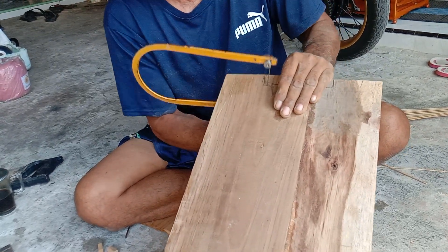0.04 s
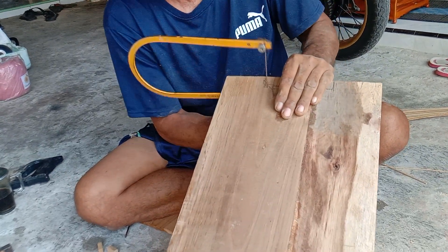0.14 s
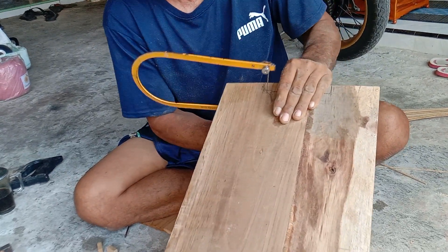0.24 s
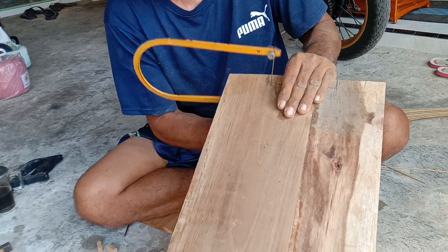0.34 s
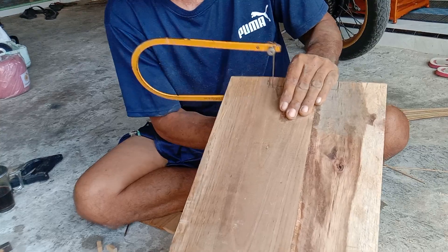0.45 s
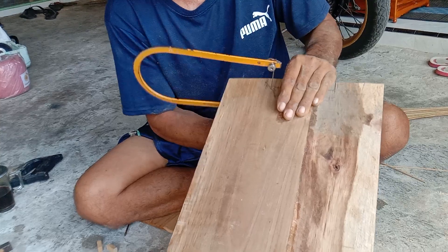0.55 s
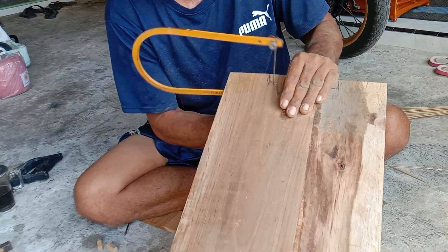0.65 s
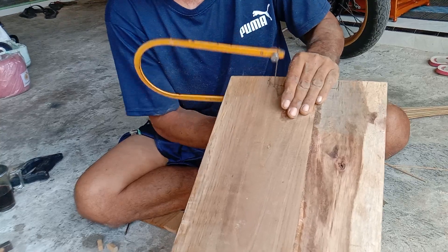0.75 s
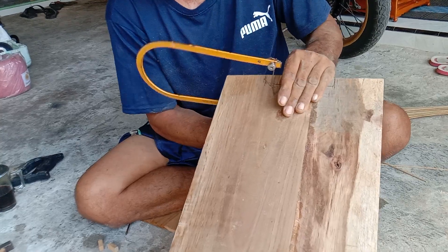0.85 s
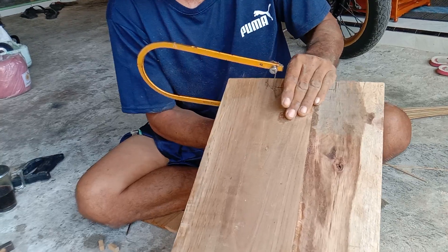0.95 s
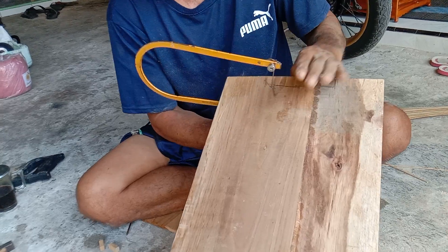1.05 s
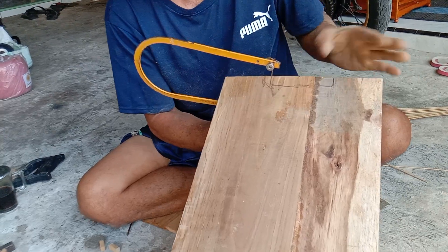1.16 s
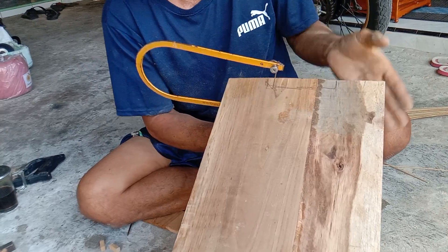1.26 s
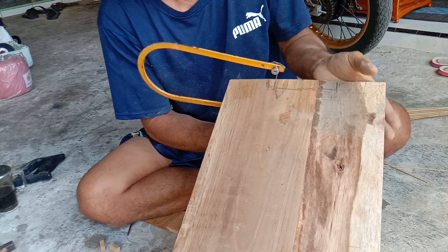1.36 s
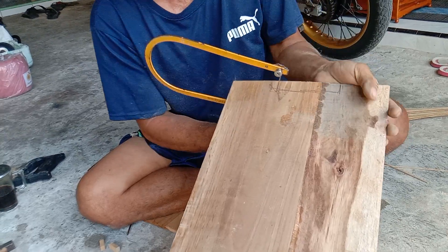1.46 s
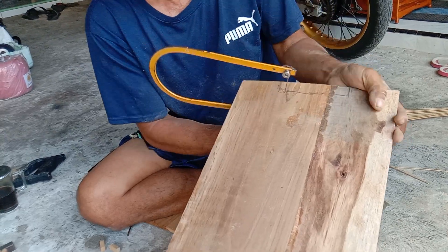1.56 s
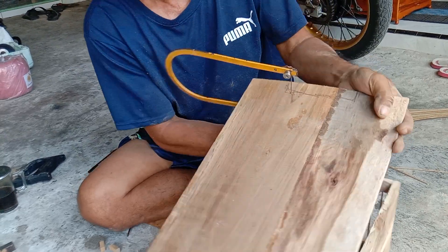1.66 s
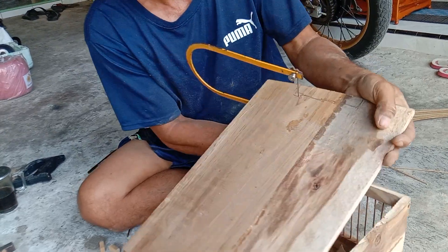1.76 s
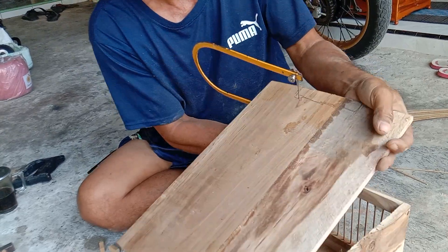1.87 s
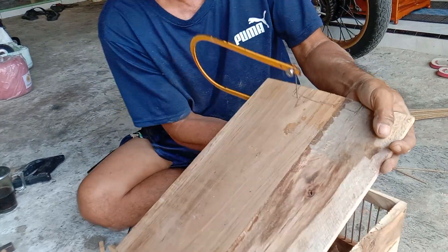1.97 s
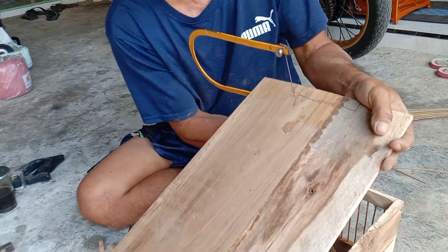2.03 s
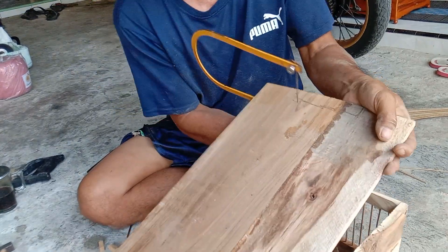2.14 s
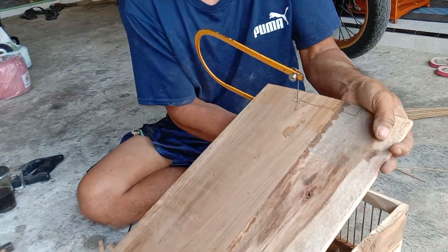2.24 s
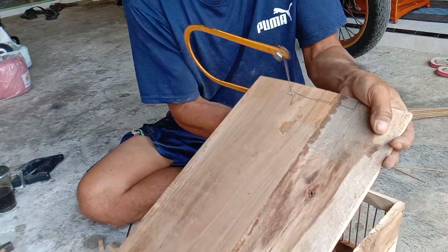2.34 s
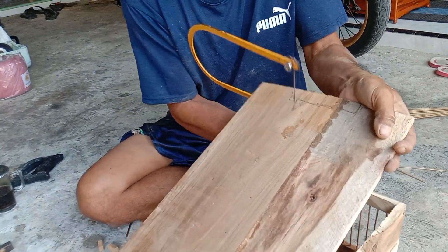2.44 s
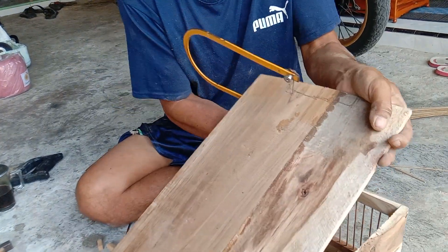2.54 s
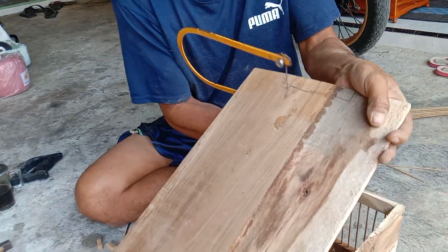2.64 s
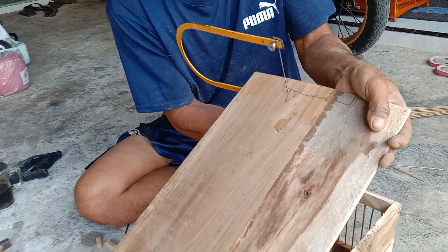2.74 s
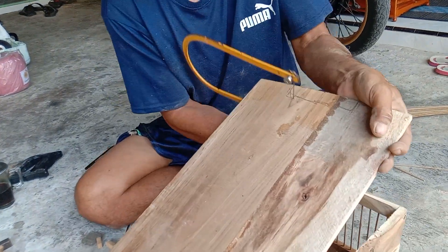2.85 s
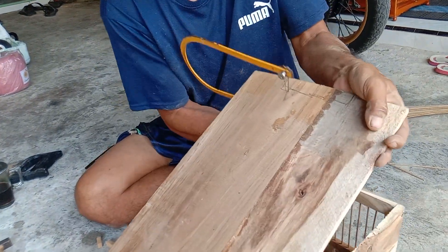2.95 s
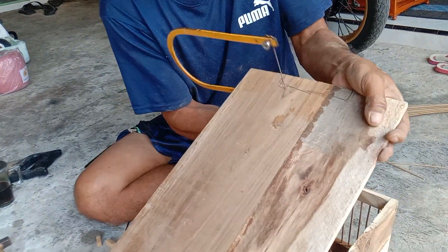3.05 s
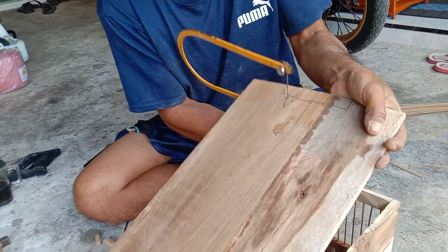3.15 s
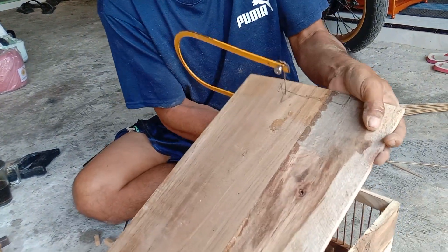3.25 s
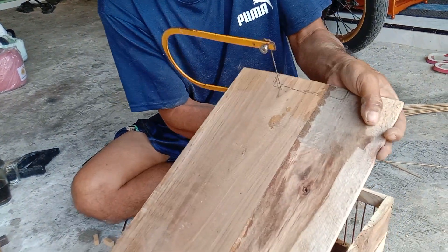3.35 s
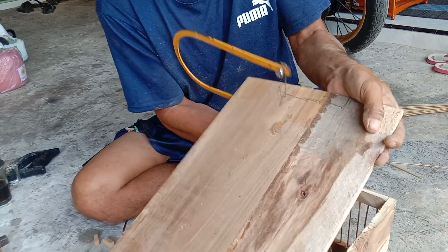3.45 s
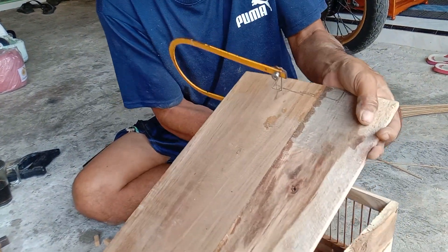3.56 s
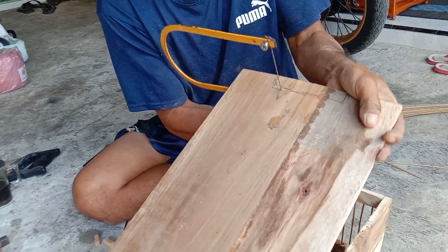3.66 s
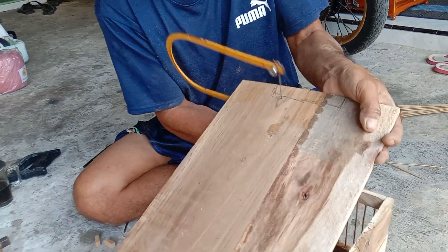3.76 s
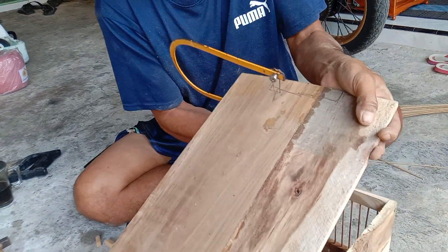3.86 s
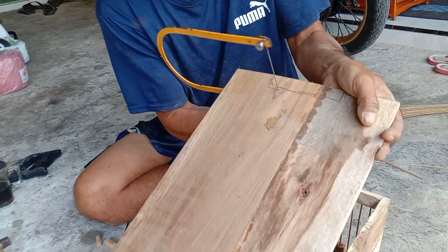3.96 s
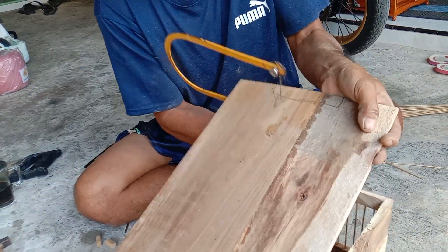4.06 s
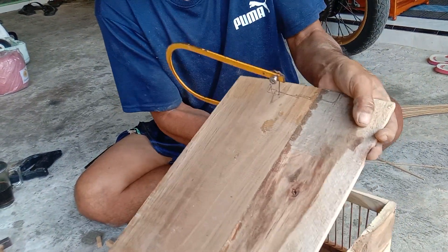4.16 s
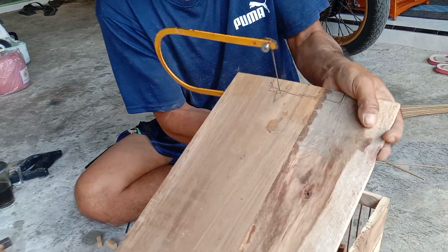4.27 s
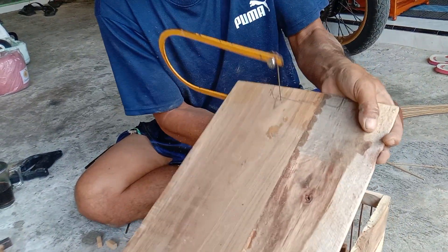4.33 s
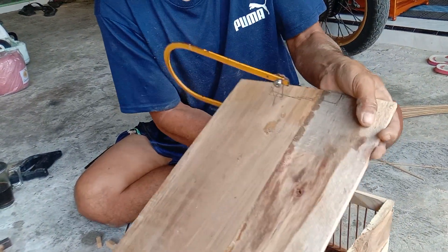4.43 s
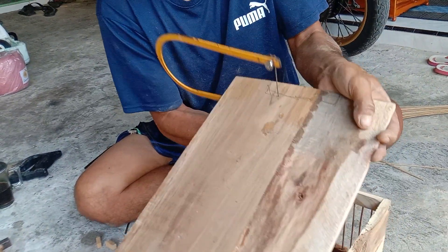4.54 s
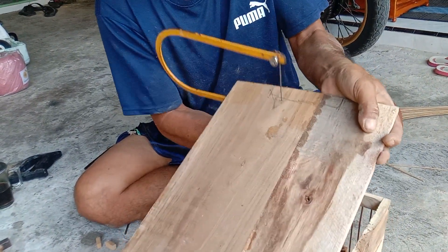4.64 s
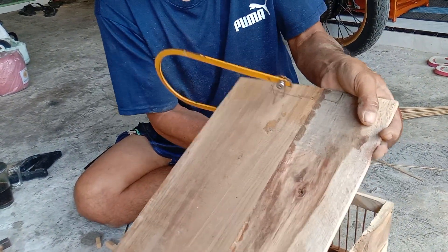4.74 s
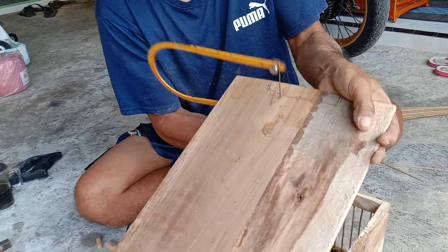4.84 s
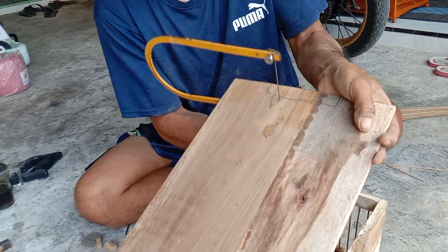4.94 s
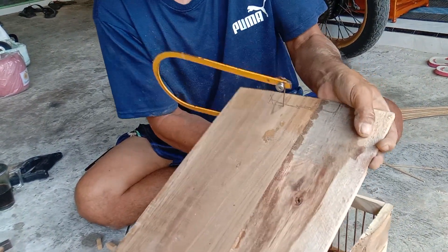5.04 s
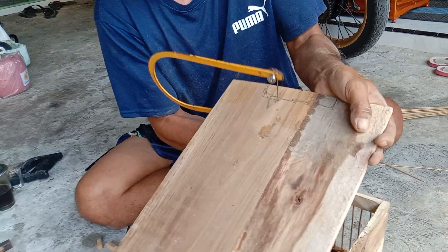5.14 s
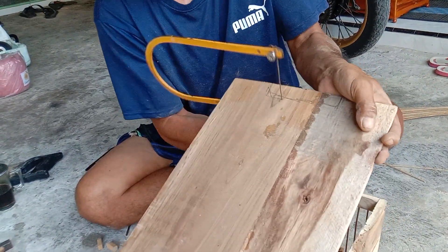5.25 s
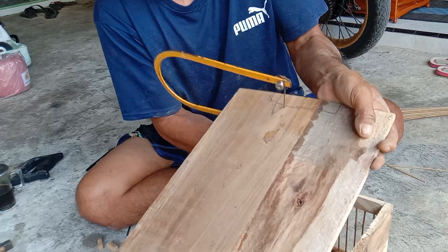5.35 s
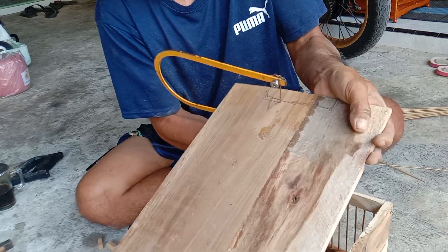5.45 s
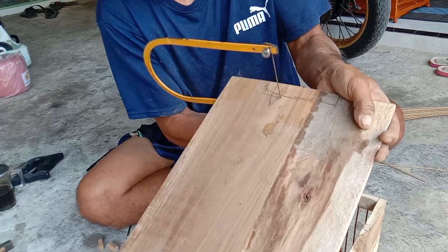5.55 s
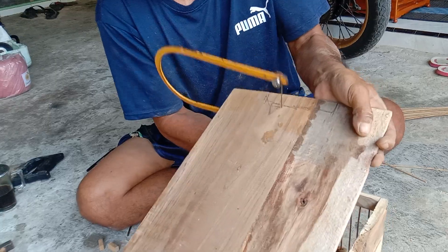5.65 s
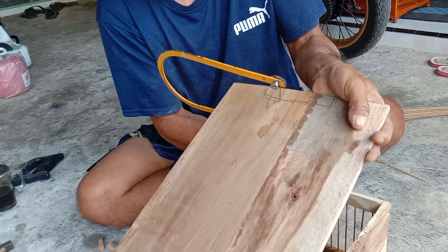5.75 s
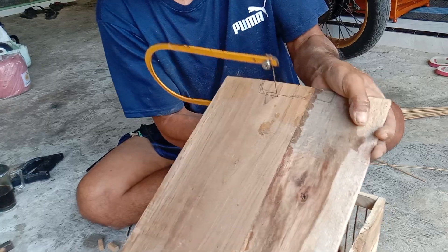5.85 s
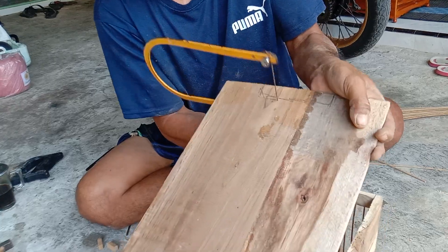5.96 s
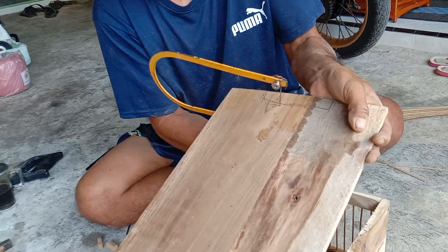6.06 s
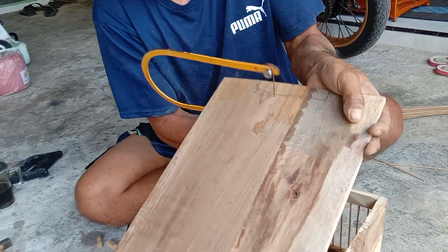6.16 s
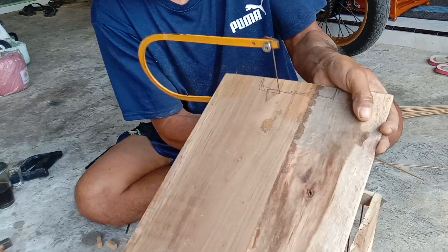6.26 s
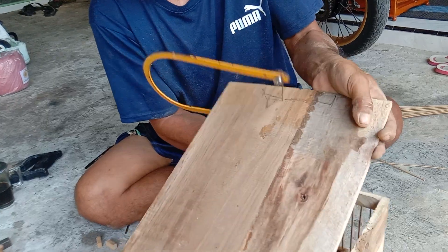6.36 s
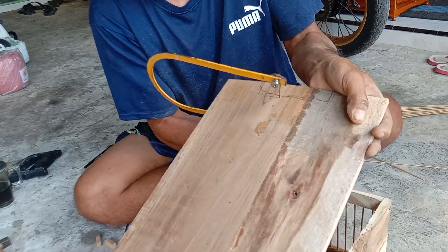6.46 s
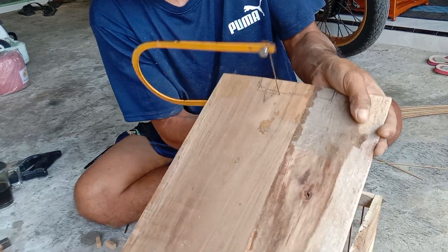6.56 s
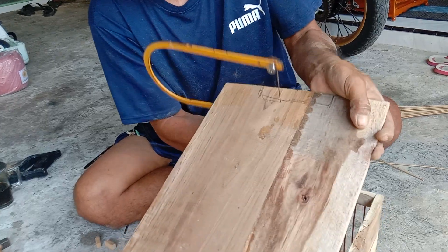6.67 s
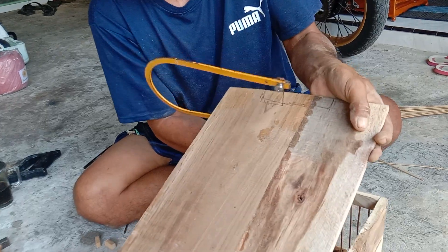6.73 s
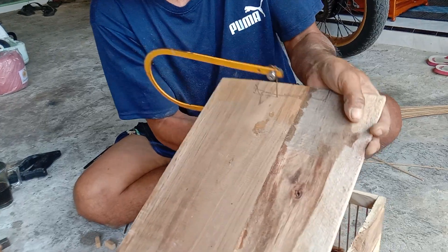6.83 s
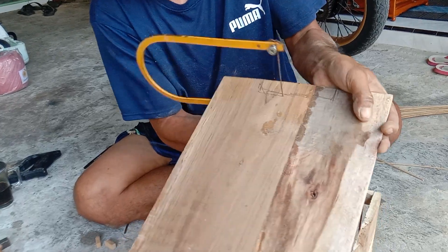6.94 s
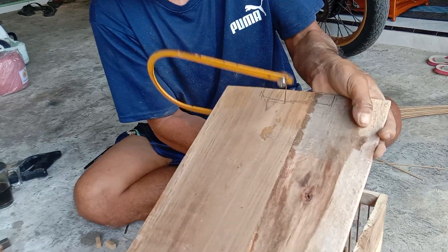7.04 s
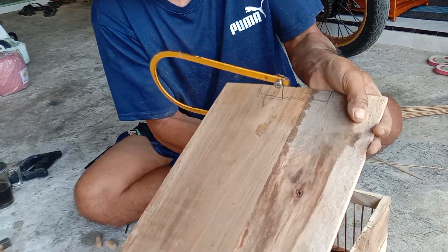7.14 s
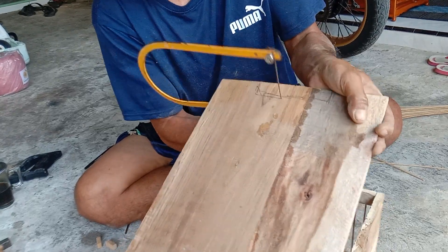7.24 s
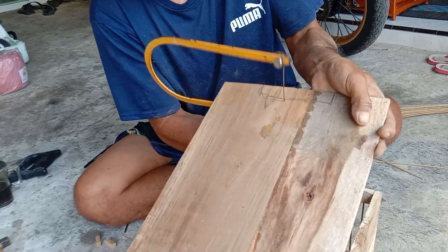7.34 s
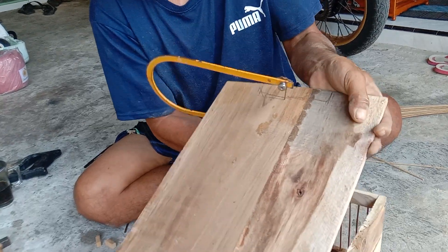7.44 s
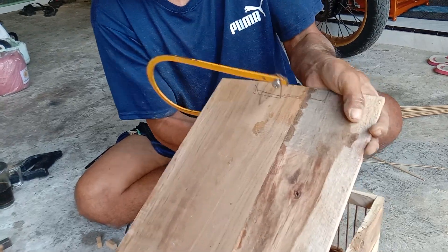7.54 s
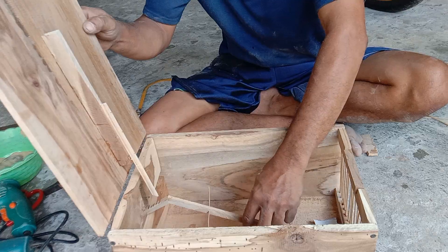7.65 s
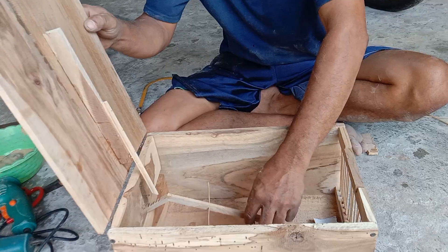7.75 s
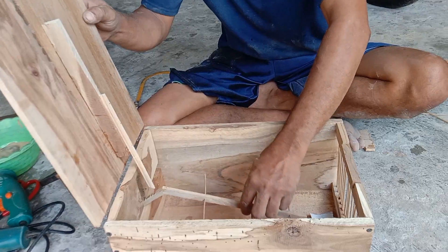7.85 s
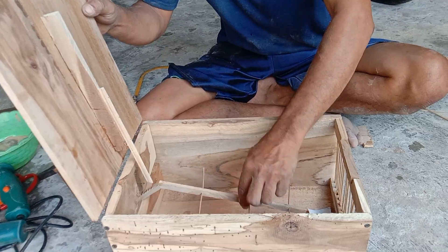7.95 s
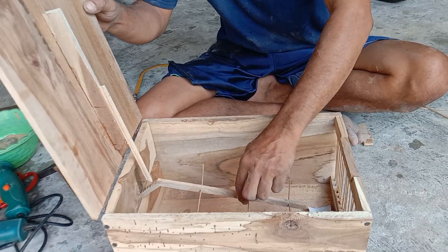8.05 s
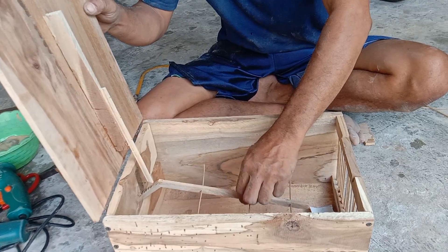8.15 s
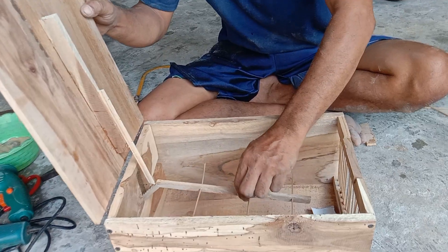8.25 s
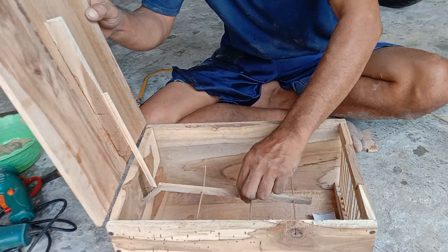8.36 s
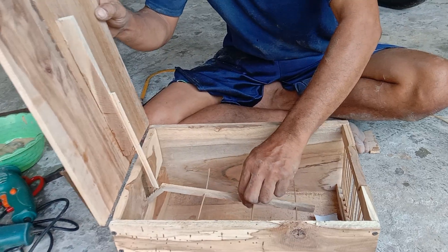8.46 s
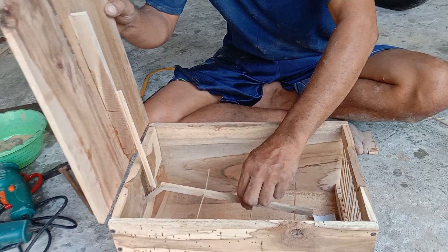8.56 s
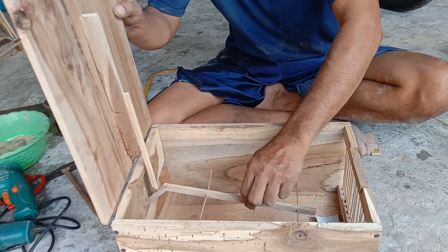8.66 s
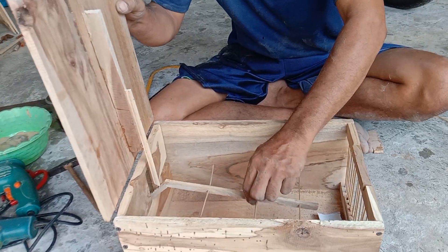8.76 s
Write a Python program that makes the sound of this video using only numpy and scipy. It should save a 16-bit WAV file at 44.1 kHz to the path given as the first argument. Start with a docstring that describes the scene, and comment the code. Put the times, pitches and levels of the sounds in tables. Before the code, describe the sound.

From 0 to about 1 second a small hand saw works in a wooden board: three strong rasping cuts with lighter return strokes, a hollow board tone, crunchy snags and bright steel ticks. From 1 to 2 seconds the sawing pauses; a hand slides over the wood with short soft rubs, strongest around 1.55 to 1.85, among faint blade flicks. From 2 to 7.47 sawing runs steadily, about three forceful cuts per second alternating with weaker returns, the board gaining body as the cut deepens. Everything drops silent until 7.58, then a tiny scrap of sawing ends at 7.62. Light wooden box knocks come near 7.7, with barely audible touches afterwards and a faint wavering low hum far off. At 8.5 a sharp, dry wooden clack rings and rattles briefly, leaving very quiet outdoor air. Close microphone, short dull porch reflections.

```python
"""A small coping saw cuts into a hand-held board on a porch, about three strokes a second, with one pause to regrip.
Striking teeth and snapping fibres, made of pulses and noise, pass through the ringing of board, blade and bow.
Short bursts add the snags and ticks of the blade; smooth noise rubs are the hand sliding on the wood.
All sound cuts out for a tenth of a second, then a brief scrap of sawing is heard; a wooden box is handled and knocked.
Faint outdoor air is shaped noise; a wavering low tone hums far off while the box is handled."""
import sys
import numpy as np
from scipy import signal
from scipy.fft import rfft, irfft
from scipy.io import wavfile
from scipy.ndimage import uniform_filter1d

SR = 44100
rng = np.random.default_rng(int(sys.argv[2]) if len(sys.argv) > 2 else 0)


def generate_wav(signal):
    """Clip the signal to [-1, 1] and save it as 16-bit WAV at the path in sys.argv[1]."""
    frames = np.transpose(np.atleast_2d(signal))
    scaled = np.clip(frames, -1, 1) * 32767
    pcm = np.round(scaled).astype(np.int16)
    wavfile.write(sys.argv[1], SR, pcm)


N = 388080
T = np.arange(N) / SR  # time axis, s
HAND_T = np.arange(0, N / SR, .001)  # coarser time axis for the hand's movements, s

# Levels in the tables are starting points: mixing trims and the final shaping come on top.
# colour of the outdoor air: [f/Hz, level/dB]
AIR = [(25, -26.5), (60, -13), (130, -11), (200, -13.5), (280, -18), (900, -28.5), (1290, -19.5),
       (1600, -24), (2200, -30.5), (3400, -32), (7000, -41), (15000, -62.5)]
AIR_DB = -70.5  # before its slow wander and fades
HUM_HZ, HUM_DB = 74, -69  # centre pitch and base level of the far hum
# wood touches the box: [t/s, level/dB]
BOX_TAPS = [(7.698, -44), (7.713, -48), (7.789, -53), (8.084, -58), (8.369, -58.5), (8.503, -20.5)]
# ringing tones of the box: [f/Hz, level/dB, time to fall 60 dB/s]
BOX_TONES = [(496, -2, 0.23), (617, -11.5, 0.26), (874, 5, 0.11), (1060, 5, 0.16), (1210, -4, 0.17),
             (1303, 9, 0.25), (1503, -8.5, 0.26), (2310, -11, 0.24), (2750, -12, .25), (2880, -7, .1),
             (3270, -17, .2), (3758, -24, 0.19), (5260, -15, 0.1), (5560, -12, .06)]
# colour of the dry clack on the box: [f/Hz, level/dB]
BOX_CRACK = [(120, -66), (200, -34), (471, -21), (858, -22.5), (1270, -6), (2060, -31), (2850, -18.5),
             (3210, -40), (5270, -41), (6150, -59), (12000, -62), (15600, -97), (22000, -120)]

# the hand slides to a new grip: [start t/s, length/s, board level/dB, hiss level/dB]
RUBS = [(1.0, 0.084, -57, -63), (1.135, 0.099, -48.5, -67), (1.4, 0.17, -51, -60),
        (1.555, 0.04, -36.5, -50), (1.61, 0.11, -46, -49), (1.7, 0.14, -33.5, -48.5),
        (1.86, 0.048, -41, -45.5)]
RUB_ATTACK_S, RUB_RELEASE_S = 0.004, .013
# colour of the hand on the wood: [f/Hz, level/dB]
RUB_COLOUR = [(53, -54.5), (90, -26.5), (135, -17), (235, -13.5), (458, -6), (735, -18), (1120, -7.5),
              (1280, -1), (1410, -7.5), (2500, -26), (3250, -56), (5500, -120)]
# colour of the dry hiss of the hand: [f/Hz, level/dB]
SCUFF_COLOUR = [(1180, -28.5), (2000, -11.5), (2220, -5.5), (4260, -6.5), (5680, -8), (6470, -25),
                (7310, -7.5), (8260, -30), (16000, -40.5)]

# the blade flicks against the side of the kerf (the slot it cuts): [t/s, level/dB, relative board level/dB]
TICKS = [(0.7166, -14.5, 1), (0.903, -16, -11), (1.122, -30.5, 1), (1.2336, -32.5, -5), (1.396, -39, 8.5),
         (1.463, -41.5, 7), (1.53, -27.5, -13), (1.5642, -28, -1), (1.6884, -25.5, -6), (1.8632, -18, -7.5),
         (2.0042, -20.5, -3), (2.5372, -13.5, -8), (2.6325, -17, 2.5), (2.7603, -16, -3.5),
         (3.46, -6.5, -4), (3.7483, -20.5, 10.5), (4.3689, -14, 1), (4.4504, -14.5, -23),
         (4.4874, -19.5, -5.5), (4.6697, -10.5, -4.5), (4.7884, -15, -4), (4.968, -15.5, 5),
         (5.1558, -22, -12), (5.546, -14, 3), (5.7496, -11, -14.5), (5.963, -17, 4), (6.1721, -28.5, -14.5),
         (6.8542, -25, -8)]
# colour of a flick against the steel: [f/Hz, level/dB]
TICK_COLOUR = [(1180, -49), (2000, -2.5), (2690, -10.5), (3170, -9), (3870, -5), (5120, -8), (6880, 0),
               (9090, -19), (10700, -21), (13700, -41), (15200, -21.5), (16000, -37)]
# spells of sawing, before and after the regrip: [start t/s, end t/s]
BOUTS_S = [(0, .97), (2.0, 7.47)]
# fainter chance flicks: how many, base level, spread either way, relative board level
FLICKS_PER_S, FLICK_DB, FLICK_SPREAD_DB, FLICK_BOARD_DB = 4, -20, -0.5, -2
# the blade snags and jumps free: [t/s, level/dB, relative treble level/dB]
CATCHES = [(0.123, -6.5, -16.5), (0.226, -10, -14.5), (0.265, -11.5, -11), (0.402, -3, -17),
           (0.526, -8.5, -12), (0.541, -11, -25), (0.577, -4.5, -11), (0.679, -3.5, -18), (0.866, -9, -9.5),
           (2.033, -2.5, -11), (2.156, -5.5, -15), (2.388, -6, -14.5), (2.463, -11, -10), (2.73, -3, -15.5),
           (2.852, -9.5, -17.5), (3.001, -4.5, -17.5), (3.044, -4.5, -12), (3.509, -5, -11.5),
           (3.676, -2, -19.5), (3.983, -3.5, -22), (4.05, -7, -7), (4.278, -2.5, -10.5), (4.588, -4.5, -12),
           (4.652, -6, -28), (4.892, -2.5, -18), (4.954, -8, -24.5), (5.228, -5.5, -19), (5.285, -6.5, -26),
           (5.316, -8, -14), (5.571, -1.5, -18.5), (5.893, -5.5, -13), (6.25, -2.5, -16), (6.586, -5, -10),
           (6.926, -8.5, -12), (7.284, -6, -10), (7.307, -4, -23), (7.589, -16, -8.5)]

# stages of the cut: board pressed flat, held by its edge, blade deep in the wood: [t/s]
STAGE_S = [1.0, 2.3, 6.5]
# board resonances before their drift: [f/Hz, width/Hz, level/dB in each of the three stages]
BOARD = [(142.8, 43, -16.5, -10.5, -4), (221.2, 51.6, -7.5, -6, 0.5), (338, 126, -13.5, -8, -5.5),
         (462.4, 130, -14, -8.5, -4.5), (582.6, 62.4, -12, -10.5, -3.5), (790, 59, -8, -7.5, -2.5),
         (934, 126, -10, -7.5, -6.5), (1079, 64, -8.5, -4, -3.5), (1206, 95, -3.5, -3.5, -3.5),
         (1294, 98, -2.5, -4, -2), (1490, 169, -12, -9, -3.5), (1793, 740, -18, -13.5, -8.5),
         (2104, 214, -25.5, -13, -5)]
# colour of the rasp in each stage, before its drift: [f/Hz, level/dB]
RASP_START = [(1530, -33), (2600, -12), (2760, -17), (3050, -2.5), (3520, -6.5), (3800, -1.5), (4100, -2.5),
              (5350, -6.5), (6050, 3), (7260, 1), (9050, -15), (10700, -17.5), (12200, -26), (13700, -32.5),
              (15100, -19.5), (16000, -31.5)]
RASP_MIDDLE = [(1530, -22.5), (2600, -4.5), (4230, 2.5), (5110, -0.5), (5350, -5), (5780, 4), (6190, -17),
               (7200, 3), (7600, -17), (8320, -17.5), (10100, -12), (12000, -23.5), (13600, -31),
               (14300, -20.5), (14900, -12), (16000, -27)]
RASP_DEEP = [(1530, -25), (2600, -7), (2910, -1.5), (3550, -1.5), (4040, 1), (4360, -3.5), (4600, -4),
             (5650, -4.5), (6300, -5), (7600, 0), (8400, -14), (10500, -11.5), (11900, -23), (13700, -31),
             (14900, -15.5), (16000, -30.5)]
# resonances of the steel blade before their drift: [f/Hz, width/Hz, level/dB]
BLADE = [(3200, 87, -15), (4020, 75, -7), (4900, 33, -4.5), (5160, 24, 1), (6000, 71, 3.5), (6400, 300, 2),
         (7525, 140, 1.5), (7392, 190, 8.5), (8960, 84, -22.5), (10200, 210, -2.5), (14500, 700, -34.5)]
# resonances of the steel bow: [f/Hz, width/Hz, level/dB]
BOW = [(1210, 92, -1.5), (1310, 55, 3.5), (2379, 54, -8), (3130, 30, -24.5)]
# ring of the bow before biting damps it: [level/dB, one per stage]
BOW_DB = [-1, -6, -2.5]
# cutting strokes: [t/s at full speed, length/s, board level/dB, rasp level/dB]
CUTS = [(0.227, 0.075, -17.5, -28.5), (0.509, 0.035, -15.5, -24.5), (0.793, 0.047, -15, -23.5),
        (2.194, 0.069, -14.5, -24.0), (2.512, 0.068, -16.5, -23.0), (2.856, 0.086, -18, -26.0),
        (3.18, 0.053, -14.5, -20.5), (3.496, 0.063, -15.5, -22.0), (3.803, 0.071, -17.5, -24.0),
        (4.108, 0.077, -14.5, -22.0), (4.417, 0.075, -17.0, -23.5), (4.72, 0.076, -15.5, -24.5),
        (5.037, 0.058, -16.0, -22.5), (5.372, 0.056, -16, -22.0), (5.694, 0.073, -16, -23.5),
        (6.036, 0.062, -15.5, -23.0), (6.377, 0.065, -14.5, -22.0), (6.719, 0.057, -16.0, -21.5),
        (7.053, 0.064, -14.5, -21.0), (7.414, 0.068, -15, -20.5)]
# lighter return strokes: [t/s at full speed, length/s, board level/dB, rasp level/dB]
RETURNS = [(0.019, 0.047, -23.5, -41.0), (0.118, 0.044, -16.5, -30.0), (0.418, 0.092, -22.5, -35.5),
           (0.643, 0.15, -21.5, -35.0), (0.902, 0.085, -25.5, -38.5), (2.062, 0.068, -19, -32.0),
           (2.372, 0.066, -19.5, -32.0), (2.701, 0.083, -19, -28.0), (3.053, 0.08, -19.5, -30.5),
           (3.355, 0.079, -23.0, -34.0), (3.676, 0.081, -20.5, -30.5), (3.973, 0.051, -16.5, -27.5),
           (4.3, 0.11, -24.0, -31.5), (4.591, 0.077, -19.5, -31.5), (4.881, 0.12, -24.0, -33.0),
           (5.227, 0.058, -17.0, -26.0), (5.564, 0.078, -24.5, -32.0), (5.901, 0.066, -19.5, -29.5),
           (6.255, 0.066, -21.5, -29.5), (6.593, 0.1, -21.5, -32.0), (6.929, 0.064, -17.5, -25.5),
           (7.279, 0.084, -21.5, -29.0), (7.593, 0.03, -21.0, -29)]
RISE_DB, FALL_DB = 12, 7.5  # steepness of a stroke's flanks, per half length
RUN_UP, START = 2.6, .8  # rest lies this far before full speed; time taken to grip (half lengths)
HISS_POWER = 1.16  # the hiss grows faster with speed than the board sound does
GRAB_DB, GRABS_PER_S = 1.29, 70  # the teeth grab unevenly within a stroke
# all sound cuts out: [start t/s, end t/s]
SILENCE_S = (7.472, 7.58)
SAW_END_S = 7.622
TOP_HZ = 15600  # hardly anything sounds above this


def undb(db):
    """Turn decibels into a gain."""
    return 10 ** (np.asarray(db) / 20)


def unit(x):
    """Scale to an rms (average strength) of 1."""
    return x / np.sqrt(np.mean(x ** 2))


def add(out, s, x):
    """Mix x into out from time s on."""
    i = int(s * SR)
    out[i:i + len(x)] += x[:N - i]


def convolve(x, response):
    """Let x ring through a response, keeping its length."""
    return signal.oaconvolve(x, response)[:len(x)]


def colour(points, size=1024):
    """Make a response of unit energy with the given spectrum that never sounds before its cause."""
    hz, db = np.transpose(points)
    bins = np.maximum(np.fft.rfftfreq(size, 1 / SR), 1)
    level_db = np.interp(np.log(bins), np.log(hz), db)
    # folding the cepstrum (the spectrum of the log spectrum) puts the energy as early as possible
    cepstrum = irfft(np.log(undb(level_db)))
    cepstrum[1:size // 2] *= 2
    cepstrum[size // 2 + 1:] = 0
    h = irfft(np.exp(rfft(cepstrum)))
    return h / np.linalg.norm(h)


def resonances(hz, width, db, size=3000):
    """Ring of unit energy from fading tones; a wider resonance dies sooner, neighbours swing oppositely."""
    t = T[:size]
    h = np.zeros(size)
    for k, (f, w, d) in enumerate(zip(hz, width, db)):
        fading = np.exp(-np.pi * w * t)
        h += (-1) ** k * undb(d) * w * fading * np.sin(2 * np.pi * f * t)
    return h / np.linalg.norm(h)


def walk(rate):
    """Smooth random wander with a spread near 1, taking about rate new values a second."""
    k = max(int(SR / rate), 1)
    steps = np.repeat(rng.standard_normal(N // k + 1), k)
    return unit(uniform_filter1d(steps, k)[:N])


def pulses(rate, scatter_db):
    """One pulse of random size per cycle of a moving rate."""
    wraps = np.diff(np.floor(np.cumsum(rate) / SR), prepend=0) > 0
    size_db = scatter_db * np.clip(rng.standard_normal(N), -2, 2)
    return unit(wraps * undb(size_db))


def even(x, count=1500):
    """Hold the slow level near 1 and keep the fast grain."""
    return x / np.sqrt(uniform_filter1d(x ** 2, count) + 1e-9)


def burst(x, db, size=500):
    """Scale a short burst by its loudest stretch, so that its peaks lie near db."""
    return x * undb(db - 11) / np.sqrt(uniform_filter1d(x ** 2, size).max())


def staged(x, responses):
    """Sound of x through responses that take over from each other as the cut advances."""
    shares = [np.interp(T, STAGE_S, row) for row in np.eye(len(responses))]
    return sum(share * convolve(x, h) for share, h in zip(shares, responses))


def at_stage(s, responses):
    """The blend of responses that holds at time s."""
    return sum(np.interp(s, STAGE_S, row) * h for row, h in zip(np.eye(len(responses)), responses))


def wandering(x, depth, rate):
    """Resonances drift up and down together as the grip and the load change."""
    shift_s = np.cumsum(depth * walk(rate)) / SR
    return np.interp(T + shift_s, T, x, period=T[-1])


def shifting(x, place, ring_s, ring_db, count=6):
    """Each place of contact (0-1) rings in its own way, so the fine colour shifts as the contact slides."""
    out, t = 0, T[:900]
    for spot in np.linspace(0, 1, count):
        ring = rng.standard_normal(len(t)) * np.exp(-t / ring_s)
        response = (t == 0) + undb(ring_db) * ring / np.linalg.norm(ring)
        nearness = np.maximum(1 - np.abs(place - spot) * (count - 1), 0)
        out = out + nearness * convolve(x, response)
    return out


def levels(rows, shape):
    """Gains of board sound and hiss for a table of movements whose powers add up."""
    wood, hiss = 1e-12, 1e-12
    for s, length, board_db, hiss_db in rows:
        speed = shape(s, length)
        wood = wood + (undb(board_db) * speed) ** 2
        hiss = hiss + (undb(hiss_db) * speed ** HISS_POWER) ** 2
    return np.array([np.interp(T, HAND_T, np.sqrt(power)) for power in (wood, hiss)])


def jolts(times, length_s, decay_s, count=5):
    """For each snag, a sharp first break, then a few more teeth that let go, each with a short crunch."""
    t = T[:3000]
    for s in times:
        force = np.zeros(len(t))
        for k, (lag, size) in enumerate(rng.random((count, 2))):
            strength = .5 + size if k else 1.5
            age = t - length_s * (k + lag * (k > 0)) / count
            force += (age >= 0) * strength * np.exp(-np.abs(age) / 0.0021 - t / decay_s)
        yield s, force * rng.standard_normal(len(t))


def background():
    """Faint outdoor air from noise, with a far, wavering hum while the box is handled."""
    air = unit(convolve(rng.standard_normal(N), colour(AIR, size=4096))) * undb(1.2 * walk(9.2))
    air_fade_db = np.interp(T, [7.5, 7.65, 8.55, 8.8], [4.0, 6.0, 0, -1.5])
    pitch = HUM_HZ * (1 + 0.021 * walk(12))
    hum = unit(np.sin(2 * np.pi * np.cumsum(pitch) / SR)) * undb(2.3 * walk(10))
    hum_fade = np.interp(T, [7.6, 7.65, 8.55, 8.65], [0, 1, 1, 0])
    return air * undb(AIR_DB + air_fade_db) + hum * undb(HUM_DB) * hum_fade


def porch(x, t60=0.2, wet_db=-17):
    """Floor and nearby walls return a short, dull tail; t60 is its time to fall 60 dB, in s."""
    t = T[:16000]
    tail = rng.standard_normal(len(t)) * np.exp(-np.log(1000) * t / t60) * (t > .004)
    tail = signal.sosfilt(signal.butter(1, 4500, fs=SR, output="sos"), tail)
    return x + undb(wet_db) * convolve(x, tail / np.linalg.norm(tail))


def box():
    """A stick scuffs onto thin panels: a dry clack, their ring, and a short rattle as it settles."""
    out, t = np.zeros(N), T[:16000]
    ring = sum(undb(db - 60 * t / t60) * np.sin(2 * np.pi * hz * t) for hz, db, t60 in BOX_TONES)
    ring_start = 1 - np.exp(-t / 0.0029)
    for s, db in BOX_TAPS:
        contact = rng.standard_normal(len(t)) * t / 0.0037 * np.exp(-t / 0.0037)
        rattle_gain = undb(2.6 * walk(147.6)[:len(t)] - 26) * np.exp(-(t / 0.082) ** 2)
        rattle = rng.standard_normal(len(t)) * rattle_gain
        clack = convolve(contact + rattle, colour(BOX_CRACK))
        add(out, s, burst(clack, db + 3.5) + burst(ring * ring_start, db - 1.5))
    return out


def slide(s, length):
    """A rub starts quickly, holds and dies away."""
    start = np.clip((HAND_T - s) / RUB_ATTACK_S, 0, 1)
    return start * np.exp(-np.maximum(HAND_T - s - length, 0) / RUB_RELEASE_S)


def rubbing(bow):
    """Board sound and hiss: a hand sticks and slips over the wood and stirs the resting saw."""
    skin = rng.standard_normal(N) * undb(7.7 * walk(70))
    place = np.interp(T, [RUBS[0][0], RUBS[-1][0]], [0, 1])
    wood = shifting(convolve(skin, colour(RUB_COLOUR)), place, ring_s=0.0057, ring_db=10.5, count=10)
    wood = wood + undb(-16) * convolve(skin, bow)
    return even(wood), even(convolve(skin, colour(SCUFF_COLOUR)))


def regrip(bow):
    """The hand rubs over the board while the saw rests."""
    return np.sum(levels(RUBS, slide) * rubbing(bow), axis=0)


def flicks():
    """Faint flicks at random moments of each bout, as rows like those of TICKS."""
    rows = []
    for (start, end), draws in zip(BOUTS_S, np.split(rng.random((100, 2)), 2)):
        for when, size in draws[:int(FLICKS_PER_S * (end - start))]:
            db = FLICK_DB + FLICK_SPREAD_DB * (2 * size - 1)
            rows.append((start + (end - start) * when, db, FLICK_BOARD_DB))
    return rows


def ticks(board):
    """Light flicks ring the steel and stir the board a little."""
    out, steel, rows = np.zeros(N), colour(TICK_COLOUR), TICKS + flicks()
    forces = jolts(np.array(rows)[:, 0], length_s=.007, decay_s=0.0069)
    for (s, force), (_, db, board_db) in zip(forces, rows):
        add(out, s, burst(convolve(force, steel), db + .5))
        add(out, s, burst(convolve(force, at_stage(s, board)), db + board_db + 3.5))
    return out


def catches(board, rasp, bow):
    """A snagged blade jumps free: it rings the bow and knocks the board, with a crunch."""
    out = np.zeros(N)
    # the knock is too brief to move the board's lowest tones much
    brief = signal.butter(1, 220, "high", fs=SR, output="sos")
    forces = jolts(np.array(CATCHES)[:, 0], length_s=.012, decay_s=0.012)
    for (s, force), (_, db, treble_db) in zip(forces, CATCHES):
        knock = signal.sosfilt(brief, convolve(force, at_stage(s, board)))
        crunch = convolve(force, at_stage(s, rasp))
        add(out, s, burst(knock, db + .5))
        add(out, s, burst(convolve(force, bow), db - 5))
        add(out, s, burst(crunch, db + treble_db + 7.5))
    return out


def swell(s, length):
    """A stroke starts from rest, speeds up to a rounded top and slows into the next turn."""
    age = 2 * (HAND_T - s) / length  # in half lengths
    flank_db = np.where(age < 0, RISE_DB, FALL_DB)
    return np.clip((age + RUN_UP) / START, 0, 1) * undb(-flank_db * (np.hypot(1, age) - 1))


def sawing(bite, board, rasp, blade, bow):
    """Board sound and rasp: teeth strike faster as they bite, fibres snap, the blade chatters in the kerf."""
    cycles = np.interp(T, np.array(CUTS)[:, 0], np.arange(len(CUTS)))
    travel = .5 + .5 * np.sin(2 * np.pi * cycles)  # place along the blade, its middle at each cut
    speed = .35 + .65 * bite
    teeth = pulses(1200 * speed * np.exp(.22 * walk(500)), scatter_db=5.5)
    slips = pulses(190 * np.sqrt(speed) * np.exp(.35 * walk(150)), scatter_db=8)
    chatter = 0.87 + unit(convolve(slips, np.exp(-T[:1000] / 0.0048)))
    snap_db = 2.0 * np.minimum(rng.exponential(size=N), 6)
    fibres = unit(rng.standard_normal(N) * undb(snap_db))

    wood = wandering(staged(chatter * (teeth + 1.08 * fibres), board), depth=.018, rate=14)
    wood = shifting(wood, travel, ring_s=0.0017, ring_db=-4.5)
    # the bow rings most while the teeth skate; biting damps it
    bow_gain = undb(np.interp(T, STAGE_S, BOW_DB) - 3.9 * bite)
    wood = wood + bow_gain * convolve(chatter * fibres, bow)

    tearing = chatter * (.25 * teeth + fibres)
    hiss = staged(tearing, rasp) + undb(-8.5) * convolve(tearing, blade)
    hiss = shifting(wandering(hiss, depth=.012, rate=12), travel, ring_s=0.0014, ring_db=1.0)
    # the finest crackle grows as the teeth dig in
    dull = signal.sosfiltfilt(signal.butter(6, 8200, fs=SR, output="sos"), hiss)
    crackle = (hiss - dull) * undb(4 - 4.5 * (1 - bite))
    return even(wood), even(dull + crackle)


def strokes(board, rasp, blade, bow):
    """Cuts and returns play the saw; the harder the stroke, the deeper the teeth bite."""
    wood_gain, rasp_gain = levels(CUTS + RETURNS, swell) * undb(GRAB_DB * walk(GRABS_PER_S))
    bite = np.clip((20 * np.log10(rasp_gain) + 42) / 22, 0, 1)  # 0 when the teeth skate, 1 when they cut
    wood, hiss = sawing(bite, board, rasp, blade, bow)
    return undb(-0.9) * wood_gain * wood + undb(0.6) * rasp_gain * hiss


def scene():
    """The sawing, a moment when all sound cuts out, a brief scrap of sawing, then the box."""
    hz, width, *stage_db = np.transpose(BOARD)
    board = [resonances(hz, width, db) for db in stage_db]
    rasp = [colour(points) for points in (RASP_START, RASP_MIDDLE, RASP_DEEP)]
    blade = resonances(*np.transpose(BLADE))
    bow = resonances(*np.transpose(BOW))
    saw = strokes(board, rasp, blade, bow) + regrip(bow) + catches(board, rasp, bow) + ticks(board)
    mix = porch(saw) * (T < SAW_END_S) + box() + background()
    sounding = (T < SILENCE_S[0]) | (T > SILENCE_S[1])
    gate = uniform_filter1d(1. * sounding, size=64)  # soft edges; all sound cuts out, air included
    return (mix * gate)[None]


def record(dry):
    """Thin the deep bass, round the loudest peaks and cut the top."""
    thin = signal.sosfilt(signal.butter(2, 62, "high", fs=SR, output="sos"), dry)
    rounded = np.tanh(0.8 * thin) / 0.81
    return signal.sosfilt(signal.ellip(8, .2, 70, TOP_HZ, fs=SR, output="sos"), rounded)


dry = scene()
out = record(dry)
generate_wav(out)
```